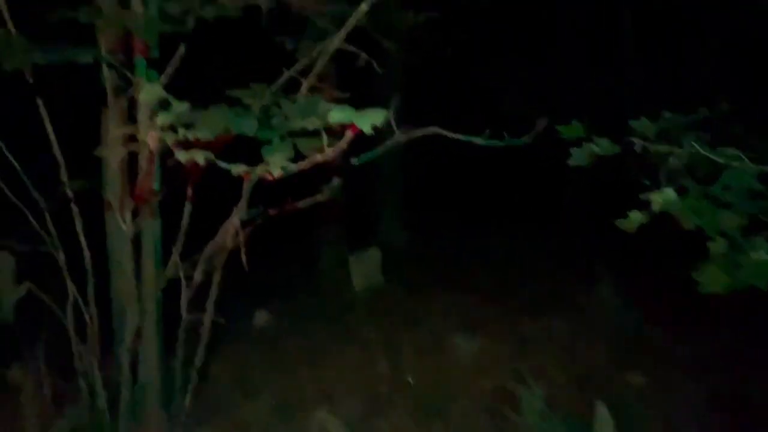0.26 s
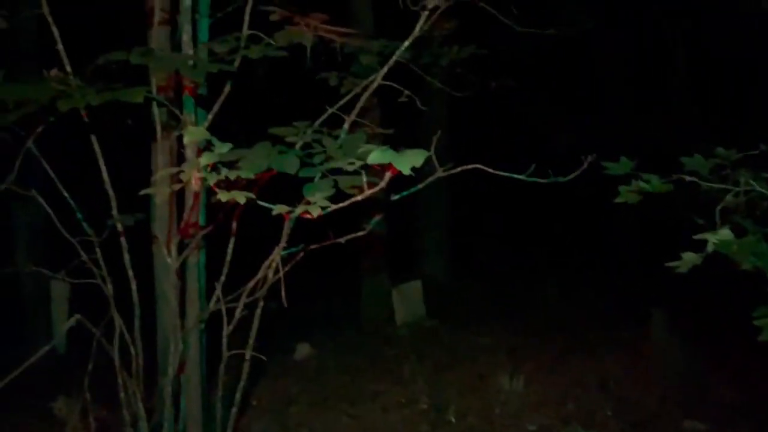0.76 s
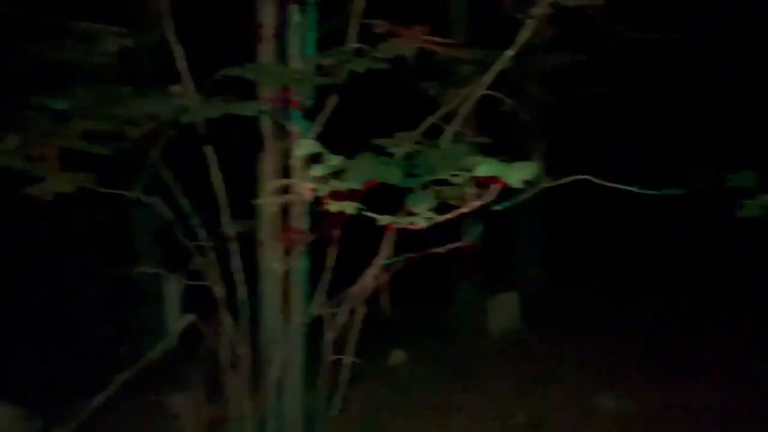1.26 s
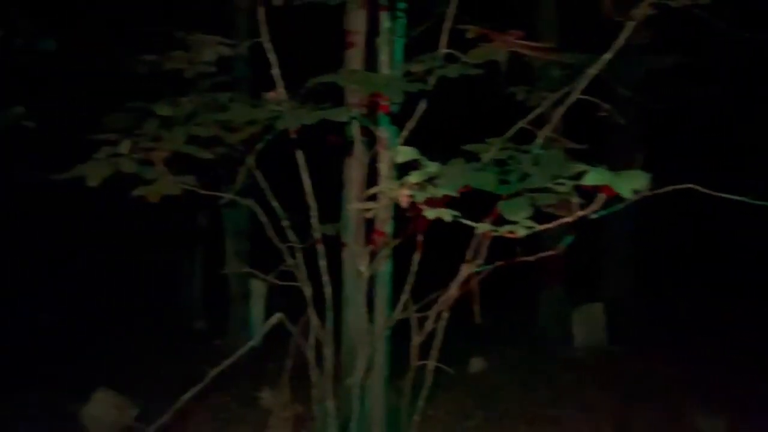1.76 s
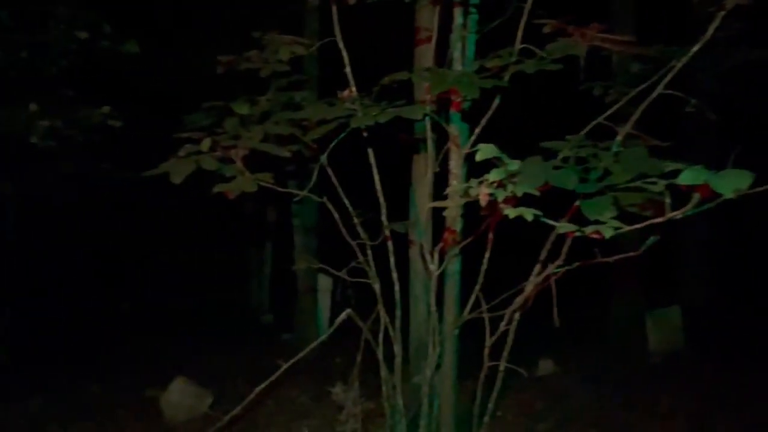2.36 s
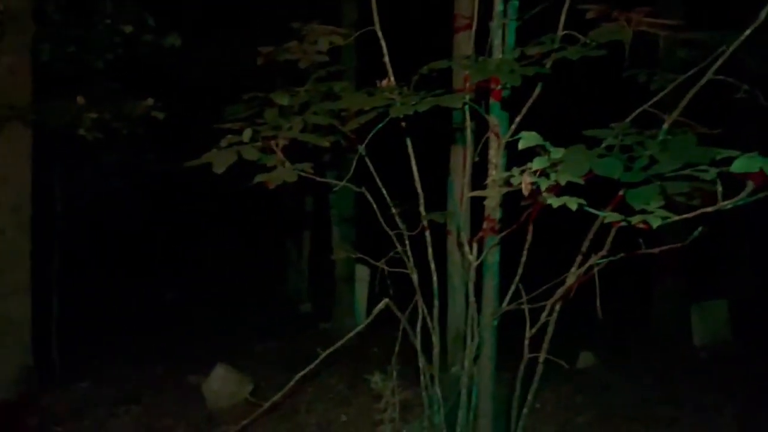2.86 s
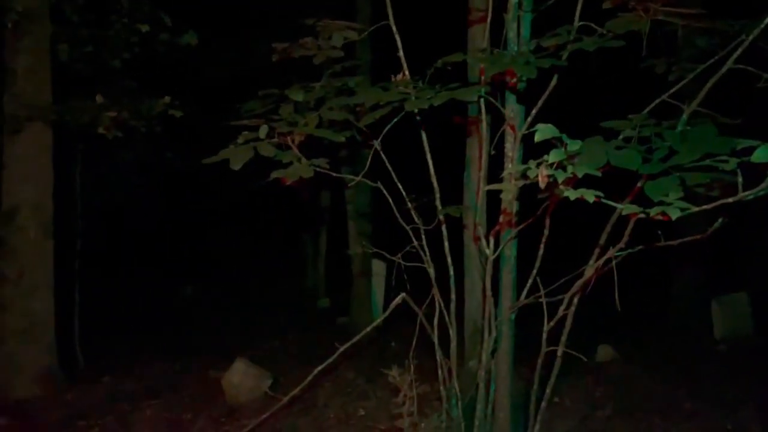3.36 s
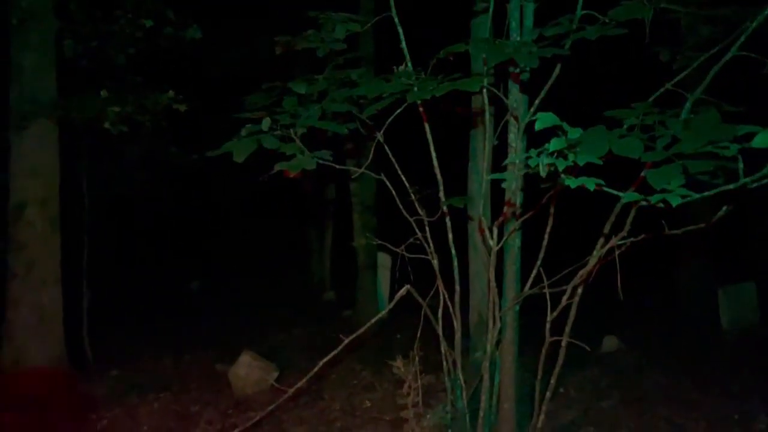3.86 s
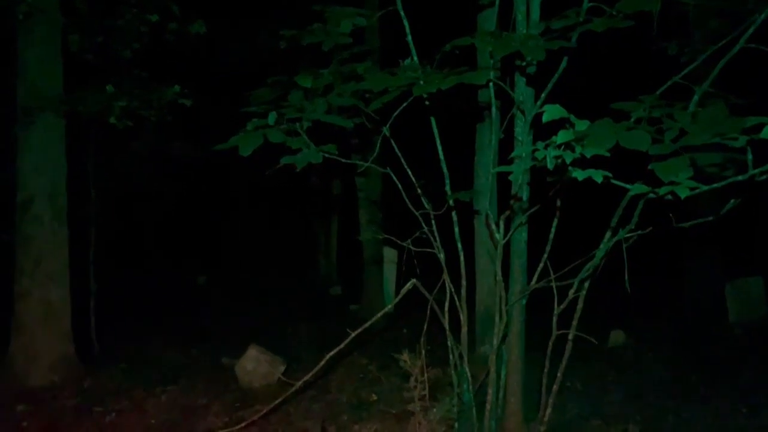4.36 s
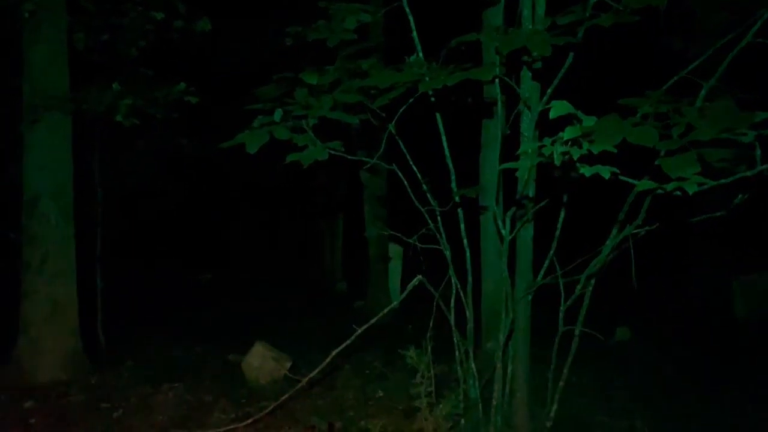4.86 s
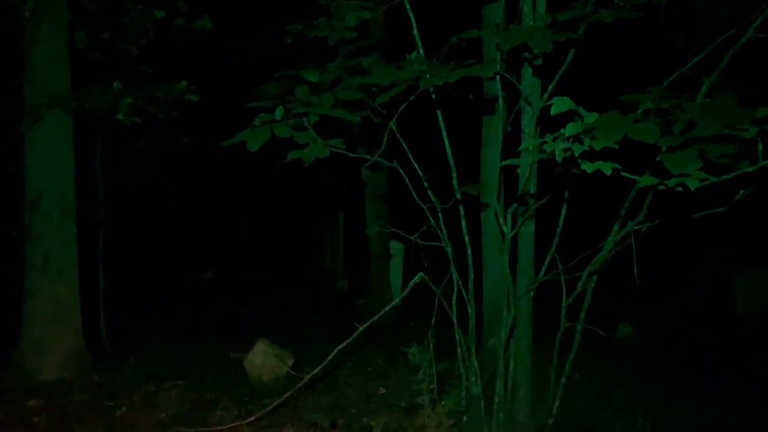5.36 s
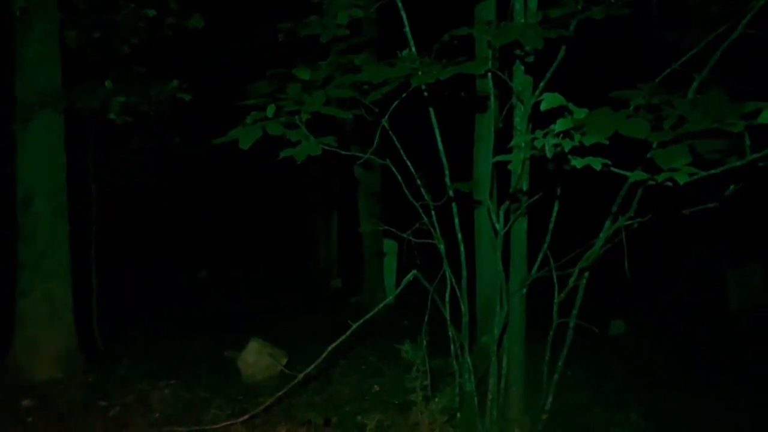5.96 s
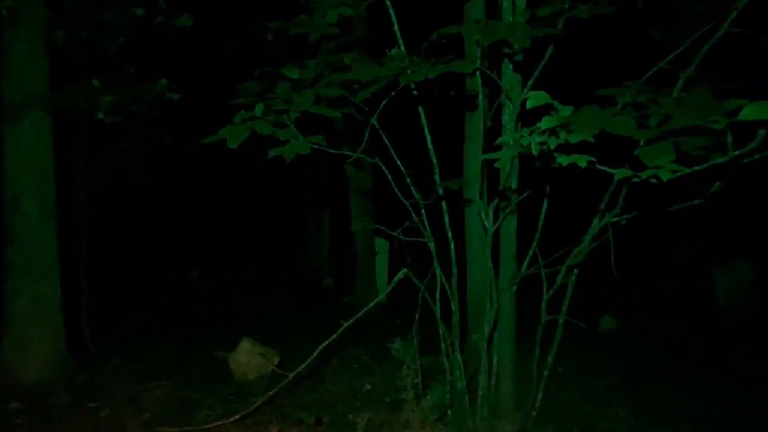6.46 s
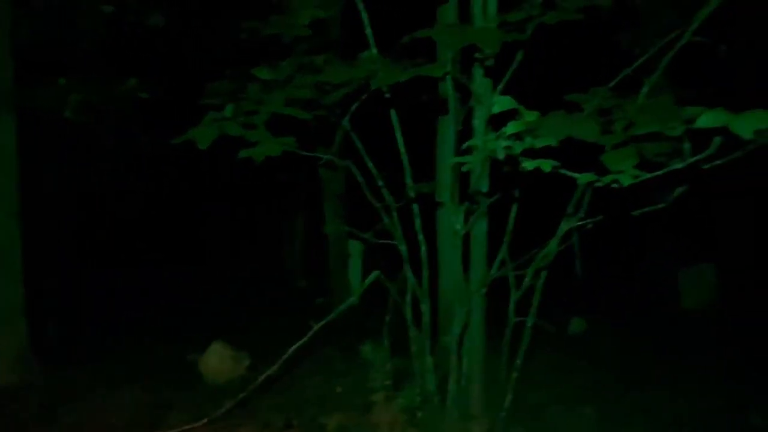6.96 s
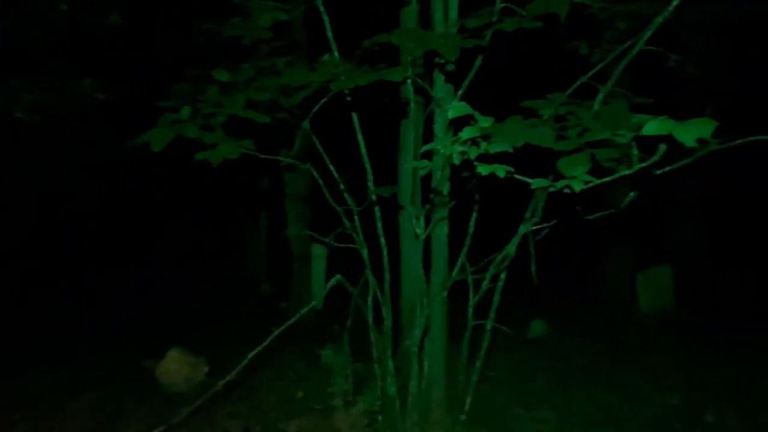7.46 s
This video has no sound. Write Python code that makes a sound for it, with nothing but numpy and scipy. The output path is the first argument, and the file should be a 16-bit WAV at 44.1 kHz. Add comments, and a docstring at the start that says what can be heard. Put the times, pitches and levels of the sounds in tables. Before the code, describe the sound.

A handheld stereo microphone in dark woodland hears continuous insects: high pulsing trills, short overlapping chirping phrases, mellow lower trills and a steady hissy buzz. A distant engine drone wavers underneath, a little stronger late. One small tick comes near one second; midway, a rough fabric rustle with crisp clicks passes close by, then only faint brushes and dull bumps follow.

```python
"""Among trees on a summer night: cricket choirs trill at several pitches over the broad buzz of katydids.
Crickets are tones gated by wing strokes with a diffuse echo; katydids and night air are shaped stereo noise.
Far engines drone below as wandering tones. Close by, cloth slides and rustles as grainy noise,
with a few snaps (millisecond noise bursts over knocks) and soft bumps (damped low rings)."""
import sys
import numpy as np
from scipy import signal
from scipy.fft import rfft, irfft
from scipy.io import wavfile

SR = 44100
rng = np.random.default_rng(int(sys.argv[2]) if len(sys.argv) > 2 else 0)


def store_pcm(level_fs):
    """Save levels as 16-bit WAV."""
    pcm = np.round(np.clip(level_fs, -1, 1) * 32767).astype(np.int16)
    wavfile.write(sys.argv[1], SR, np.atleast_2d(pcm).T)


N = 339570


def from_db(db):
    """Gain of a level in dB."""
    return 10 ** (np.asarray(db) / 20)


def rms_one(x):
    """Scale to unit rms."""
    return x / np.sqrt(np.mean(x ** 2) + 1e-20)


def in_time(rows):
    """Columns of a table, interpolated to one value per sample."""
    time_s, *columns = np.transpose(rows)
    return [np.interp(np.arange(N) / SR, time_s, column) for column in columns]


def at_hz(points):
    """A table read at every FFT bin on a log-frequency axis."""
    bin_hz = np.maximum(np.arange(N // 2 + 1) * SR / N, 1)
    point_hz, value = np.array(points).T
    return np.interp(np.log(bin_hz), np.log(point_hz), value)


def drift(rate_hz):
    """Slow chance: noise through a double one-pole low-pass, unit rms, computed every 40 samples."""
    step, settle = 40, 2000  # samples, steps
    pole = np.exp(-2 * np.pi * rate_hz * step / SR)
    noise = rng.standard_normal(N // step + settle + 2)
    slow = signal.lfilter([1], [1, -2 * pole, pole * pole], noise)[settle:]
    return np.interp(np.arange(N) / step, np.arange(len(slow)), rms_one(slow))


def colour(x, spectrum):
    """Filter by a spectrum in dB, then scale to unit rms."""
    return rms_one(irfft(rfft(x) * from_db(at_hz(spectrum)), N))


def wide_noise(spectrum, flicker_db, flicker_hz):
    """Diffuse noise at two microphone ports: their likeness and level lean vary with frequency."""
    # columns: freq_hz, left_right_likeness (0 to 1)
    likeness = [(60, 1), (130, 0.67), (290, 0.65), (640, 0.074), (1410, 0.015), (3100, 0.18), (6820, 0.92),
                (15000, 0.17)]
    # columns: freq_hz, left_minus_right_db
    lean = [(60, 2.5), (180, 1.5), (550, 1.5), (1650, 3), (4970, 3), (15000, 9.5)]
    mid, side = rfft(rng.standard_normal((2, N)))
    alike = np.clip(at_hz(likeness), 0, 1)
    signs = np.array([[1], [-1]])
    pair = np.sqrt(1 + alike) * mid + np.sqrt(1 - alike) * side * signs
    pair *= from_db(at_hz(lean) / 2 * signs)
    pair[1] *= np.exp(-2j * np.pi * np.arange(N // 2 + 1) / N)  # right port one sample late
    return colour(irfft(pair, N), spectrum) * from_db(flicker_db * drift(flicker_hz))


def swell(since_s, length_s, rise_s, fall_s):
    """Gain that rises linearly, holds to the given length, then falls."""
    rise = since_s / rise_s
    fall = (length_s - since_s) / fall_s + 1
    return np.clip(np.minimum(rise, fall), 0, 1)


def trill(pitch_hz, strokes_per_s, sharpness, scatter_rad):
    """Each wing stroke is a short tone that sags in pitch, with a new phase and strength."""
    tempo_drift, sag_hz = .004, 70  # share of the stroke rate; fall over one stroke
    rate = strokes_per_s * (1 + tempo_drift * drift(3.8))
    stroke = np.cumsum(rate) / SR + rng.random()
    slip, strength = rng.standard_normal((2, 1000))
    which = stroke.astype(int)
    sagging_hz = pitch_hz - sag_hz * (stroke % 1 - .5)
    phase = 2 * np.pi * np.cumsum(sagging_hz) / SR + scatter_rad * np.cumsum(slip)[which]
    pulse = np.abs(np.sin(np.pi * stroke)) ** sharpness
    return np.sin(phase) * pulse * from_db(0.28 * drift(16) + 1.6 * strength[which])


def wing_band(song, hz):
    """The wings radiate only near their own pitch."""
    width = .1  # share of the pitch passed to either side
    edges_hz = [hz * (1 - width), hz * (1 + width)]
    return signal.sosfilt(signal.butter(2, edges_hz, "band", fs=SR, output="sos"), song)


def among_trees(song, pan_db, echo_db):
    """The trunks scatter a song into a diffuse tail of its own at each port; unit rms."""
    wood_t60_s = 0.75
    t = np.arange(SR // 2) / SR
    tail = rng.standard_normal((2, len(t))) * from_db(-60 * t / wood_t60_s)
    echoes = rms_one(signal.fftconvolve(song[None], tail, axes=1)[:, :N])
    direct = np.array([song, np.roll(song, 1)])  # right port one sample late
    mix = rms_one(direct) + from_db(echo_db) * echoes
    return rms_one(mix * from_db([[pan_db / 2], [-pan_db / 2]]))


def choir(hz, gain, spread_hz, strokes_per_s, sharpness, scatter_rad, pan_db, echo_db, count):
    """Crickets of one kind spread roughly evenly in pitch, each at its own tempo."""
    places = np.arange(count) - (count - 1) / 2 + rng.uniform(-.3, .3, count)
    places *= 2 / count
    places -= places.mean()
    song = np.zeros(N)
    for place in places:
        pitch_hz = hz + spread_hz * (place + .25 * drift(2.5))
        song += trill(pitch_hz, strokes_per_s * (1 + .03 * place), sharpness, scatter_rad)
    return gain * among_trees(wing_band(song, hz[-1]), pan_db, echo_db)


def on_curve(rows):
    """Pitch and gain of a choir that sings throughout."""
    hz, level_db = in_time(rows)
    return hz, from_db(level_db)


def lone_trills():
    """Pitch and gain of a lone middle voice: each trill starts flat, climbs to its pitch and slowly fades."""
    # columns: start_s, length_s, settled_hz, start_db
    trills = [(-0.96, 1.42, 2585, -56.5), (1.84, 2.07, 2600, -58), (5.0, 1.75, 2596, -60),
              (7.5, .6, 2630, -59.5)]
    climb_hz, climb_s, edge_s, fade_db_per_s = 99.63, .13, 0.066, 0.55
    t, hz, gain = np.arange(N) / SR, np.zeros(N), np.zeros(N)
    for start_s, length_s, settled_hz, start_db in trills:
        since_s = t - start_s
        on = since_s >= 0
        hz[on] = settled_hz - climb_hz * np.exp(-since_s[on] / climb_s)
        gain += from_db(start_db - fade_db_per_s * since_s) * swell(since_s, length_s, edge_s, edge_s)
    return hz, gain


def surges():
    """Pitch and gain of the high choir: each surge swells fast, sinks and creeps up in pitch."""
    # columns: start_s, level_db (before rise and sink)
    surge_rows = [(-.04, -48.5), (.3, -46), (.56, -47), (.92, -47), (1.3, -47), (1.82, -47.5),
                  (2.08, -49.5), (2.29, -47), (2.679, -48), (3.1, -48), (3.731, -45.5), (4.13, -45),
                  (4.548, -44), (4.9, -55), (5.26, -46.5), (5.619, -46), (5.99, -45.5), (6.338, -46),
                  (6.699, -46), (7.14, -46.5), (7.4, -44.5)]
    start_hz, floor_db = 5762, -53
    rise_s, sink_db_per_s, climb_hz_per_s = 0.026, 25, 120
    t, hz, gain = np.arange(N) / SR, np.zeros(N), np.full(N, from_db(floor_db))
    for start_s, level_db in surge_rows:
        since_s = np.maximum(t - start_s, 0)
        on = t >= start_s
        hz[on] = start_hz + climb_hz_per_s * since_s[on]
        surge = from_db(level_db - sink_db_per_s * since_s) * np.minimum(since_s / rise_s, 1)
        gain = np.maximum(gain, surge)
    return hz, gain


def cricket_choirs():
    """Five kinds of cricket: low, lone middle, high, farther middle and one thin low voice."""
    # one row a kind: spread_hz, strokes_per_s, sharpness, scatter_rad, left_minus_right_db, echo_db
    kinds = [(74.9, 55, 1.9, 0.937, 3, 3), (8, 58.7, 2.2, 0.46, 8.5, -5.5),
             (60.07, 52, 0.57, 0.937, 7.5, -2), (40.05, 58, 1.8, 0.793, 3, -4),
             (8.276, 50, 0.38, 0.904, 14, 0.5)]
    # crickets in each choir
    counts = [4, 1, 5, 3, 1]
    # slowly drifting choirs, columns: time_s, wing_pitch_hz, level_db
    low_choir = [(0.0, 2160, -61), (0.23, 2130, -59.5), (0.32, 2102, -62.5), (3.19, 2110, -68),
                 (3.28, 2150, -60), (3.43, 2145, -59), (3.47, 2160, -63), (3.67, 2180, -59),
                 (3.77, 2140, -63.5), (4.24, 2168, -59), (4.97, 2173, -65.5), (5.38, 2170, -61),
                 (5.49, 2164, -72), (5.53, 2145, -65), (7.27, 2134, -63.5), (7.4, 2190, -58),
                 (7.46, 2115, -70), (7.7, 2067, -68)]
    far_choir = [(0, 2632, -61), (.4, 2620, -57), (.5, 2640, -59.5), (1, 2652, -63.5), (1.8, 2628, -67),
                 (2, 2647, -63), (3.8, 2640, -63), (4.1, 2665, -63), (4.7, 2673, -69), (6.9, 2656, -62),
                 (7.7, 2640, -62.5)]
    thin_voice = [(0, 1967, -83), (1.3, 1988, -68), (5.1, 1977, -67.5), (5.4, 1976, -76), (6.4, 1992, -72),
                  (6.7, 1974, -70), (7.7, 1987, -68)]
    songs = [on_curve(low_choir), lone_trills(), surges(), on_curve(far_choir), on_curve(thin_voice)]
    return sum(choir(*song, *kind, count=n) for song, kind, n in zip(songs, kinds, counts))


def phrases():
    """Crickets in short phrases: each glides from its first pitch, with soft ends, sung by two neighbours."""
    # columns: start_s, length_s, first_hz, glide_hz, gain_db
    phrase_rows = [(0.0, 0.98, 4970, 50.5, -62.5), (.38, 0.26, 4850, 50.5, -58.5),
                   (.76, 0.3, 4400, 48.5, -65), (.62, 0.38, 4895, 170, -68), (1.08, 0.435, 5100, 80, -55.5),
                   (1.04, 0.3, 4800, -40, -59), (1.25, .28, 4830, 29.5, -61), (1.93, .2, 4870, 19, -60),
                   (1.96, 0.37, 4960, 30, -61.5), (2.15, 0.33, 4680, -9.5, -62),
                   (2.44, 0.36, 4950, 11, -66), (2.9, 0.32, 4880, 50.5, -62), (3.08, 0.36, 5060, 49.5, -53),
                   (3.07, 0.2, 4510, 51, -60), (3.58, .3, 4800, 39.5, -60), (3.74, 0.22, 5000, 50, -59),
                   (4.14, 0.33, 4970, 11, -59), (4.16, .4, 4800, -20.5, -67), (4.76, .3, 4930, 20, -60),
                   (4.86, 0.35, 4760, 61, -62), (4.9, .3, 4613, 19, -67), (5.02, 0.29, 5020, 29, -61),
                   (5.3, 0.26, 4930, 32, -62), (5.54, 0.29, 4880, 190, -57.5), (5.8, 0.32, 5100, 52, -53.5),
                   (6.05, 0.36, 4674, -9, -59), (6.28, 0.55, 4847, 122, -67), (6.42, .33, 4420, 1, -68),
                   (6.86, 0.3, 4950, 19, -65), (6.9, .36, 4750, 30, -61.5), (6.92, .3, 4520, -2, -68),
                   (7.25, 0.3, 4850, 43.5, -61), (7.3, .3, 4680, 30, -68), (7.48, 0.25, 4996, 93, -60)]
    # pitch offsets of the two neighbours [Hz]
    neighbours_hz = [-25, 22.13]
    strokes_per_s, slip_rad, edge_s, pan_db, echo_db = 55, .85, 0.044, 7, 3.5
    song, t = np.zeros(N), np.arange(N) / SR
    voices = [(np.full(N, 5000.), np.zeros(N)) for _ in range(4)]  # pitch, gain; phrases take turns
    for k, (start_s, length_s, first_hz, glide_hz, gain_db) in enumerate(phrase_rows):
        pitch_hz, gain = voices[k % 4]
        on = (t >= start_s) & (t < start_s + length_s)
        part = (t[on] - start_s) / length_s
        to_end_s = length_s * np.minimum(part, 1 - part)
        pitch_hz[on] = first_hz + glide_hz * part ** 0.86
        gain[on] = from_db(gain_db) * np.minimum(1, to_end_s / edge_s)
    for k, (pitch_hz, gain) in enumerate(voices):
        rate = strokes_per_s + 3.0 * (k - 1)
        pair = sum(trill(pitch_hz + hz + 20 * drift(8), rate, 1.5, slip_rad) for hz in neighbours_hz)
        song += gain * rms_one(pair)
    song = wing_band(song, 4870)
    return song.std() * among_trees(song, pan_db, echo_db)


def katydids():
    """Far katydids swell together: flickering noise on a level curve."""
    # columns: freq_hz, density_db (relative, per Hz)
    spectrum = [(2500, -23), (2900, -4), (3150, -1.5), (3650, -3), (3950, -13), (4150, -18), (4500, -6),
                (4950, 1), (5180, -10.5), (5350, -5), (5600, -55)]
    # columns: time_s, level_db
    song = [(0, -61.5), (.45, -61), (.67, -61), (.82, -66.5), (.98, -59), (1.29, -59.5), (1.4, -63),
            (1.55, -60), (2.03, -64.5), (2.15, -61), (2.7, -60), (2.82, -69), (2.95, -58.5), (3.75, -60.5),
            (4.1, -64.5), (4.55, -61.5), (5.1, -62.5), (5.4, -65.5), (5.7, -58.5), (6.25, -66), (7.05, -58),
            (7.7, -66)]
    [level_db] = in_time(song)
    return from_db(level_db) * wide_noise(spectrum, 1.63, 8.9)


def rasp():
    """A thinner rasp between the choirs: narrower noise with hollows in its level."""
    # columns: freq_hz, density_db (relative, per Hz)
    spectrum = [(3500, -34), (3800, 3.5), (4100, -3), (4450, -0.5), (4700, -57)]
    # columns: time_s, level_db
    song = [(0, -71), (.6, -74), (.8, -74), (.95, -67), (1.25, -64), (1.4, -74), (1.52, -69), (1.82, -67),
            (2.0, -78), (2.3, -68), (2.55, -74), (2.9, -66), (3.7, -69), (4.1, -76), (4.55, -71),
            (4.95, -72), (5.12, -88), (5.42, -76), (5.6, -73), (6.02, -73), (6.15, -80), (6.33, -80),
            (6.45, -70), (6.8, -78), (7.06, -66), (7.7, -81)]
    [level_db] = in_time(song)
    return from_db(level_db) * wide_noise(spectrum, 2.7, 10.0)


def buzz():
    """Broad insect buzz: two unbroken bands of noise with a slight flicker."""
    # columns: freq_hz, density_db (relative, per Hz)
    middle = [(5300, -35.5), (5600, -2.5), (5900, -0.5), (6500, 2.5), (6750, -5), (7130, -15.5),
              (7600, -38), (8200, -103)]
    high = [(8300, -48), (9200, -9.5), (10000, -20), (10700, -7), (11500, -1.5), (12000, -7), (12900, -11),
            (13600, -33), (14300, -69)]
    return from_db(-47) * wide_noise(middle, 0.8, 22.0) + from_db(-67) * wide_noise(high, 0.67, 15.0)


def drones():
    """Engine notes blurred by distance: tones whose size and phase wander."""
    # columns: time_s, drifting_note_hz, its gain_db, gain_db of each of three steady notes
    drone_rows = [(0, 115.7, -57, -58, -70, -67), (.8, 112.6, -64, -58, -50.5, -57),
                  (2.3, 114.7, -56, -66, -57, -62.5), (2.9, 115.9, -56.5, -54, -56, -61.5),
                  (3.9, 112.5, -57, -56, -57, -62), (4.3, 109.7, -51.5, -45, -66, -63),
                  (4.9, 110.5, -56, -46.5, -61, -71), (5.9, 111.5, -54.5, -46.5, -56, -66),
                  (6.3, 115.1, -53.5, -52.5, -61, -73), (6.85, 115, -47, -41, -65, -52),
                  (7.2, 113, -52.5, -50, -72, -63), (7.7, 116, -50.5, -51, -71, -64)]
    # pitches of the steady notes [Hz]
    steady_hz = [69.16, 82.9, 131.3]
    drifting_hz, *gains_db = in_time(drone_rows)
    notes_hz = [drifting_hz] + [np.full(N, hz) for hz in steady_hz]
    out = np.zeros(N)
    for hz, gain_db in zip(notes_hz, gains_db):
        phase = 2 * np.pi * np.cumsum(hz) / SR
        tone = (2.14 + drift(2.8)) * np.sin(phase) + drift(3.8) * np.cos(phase)
        out += from_db(gain_db) * rms_one(tone)
    return out * np.array(from_db([[.9], [-.9]]))


def night_air():
    """Night air, from far traffic up to the farthest insects: broad noise that swells and ebbs."""
    # columns: freq_hz, density_db (relative, per Hz)
    spectrum = [(20, -48), (33, -31), (44, -2), (70, 0.5), (130, -12), (250, -15.5), (500, -27),
                (1100, -52.5), (1700, -35.5), (2400, -25), (3600, -45), (4050, -57), (4500, -43),
                (5200, -39), (5500, -30), (7500, -76), (9000, -84)]
    # columns: time_s, swell_db (only its departure from the mean counts)
    swell_rows = [(0, -60), (.6, -61.5), (2.1, -62.5), (2.5, -60.5), (3.8, -61.5), (4.6, -63), (7.7, -62)]
    [swell_db] = in_time(swell_rows)
    return from_db(-48.5 + swell_db - swell_db.mean()) * wide_noise(spectrum, 1.7, 5.4)


def handling():
    """Gains of fine hiss, coarse hiss and body over time: the main slide of cloth and small brushes."""
    # columns: time_s, fine_hiss_db, body_over_fine_db
    slide = [(3.05, -88, -3), (3.13, -62, -7), (3.23, -59, 4), (3.285, -35.5, -3), (3.32, -35, -2.5),
             (3.355, -36.5, -0.5), (3.4, -34, 0.5), (3.435, -37.5, 1), (3.444, -40, 2), (3.48, -47.5, 5.5),
             (3.51, -41.5, -4), (3.6, -54.5, 4.5), (3.63, -46.5, 2), (3.645, -44.5, -6), (3.675, -48, 7.5),
             (3.72, -61.5, 4.5), (4.02, -63.5, -4), (4.1, -78, 5)]
    # columns: start_s, length_s, fine_hiss_db, coarse_over_fine_db, body_over_fine_db
    brushes = [(0.94, 0.017, -72, 4, 2), (4.122, 0.094, -82, 3, 10), (4.326, .03, -60, -17, -1),
               (4.393, 0.1, -77, 9, 10), (4.682, 0.026, -83, 11, 8), (4.778, 0.029, -86, 6, -1),
               (5.418, .1, -57.5, -50, -36), (5.54, 0.096, -67.5, -41, -8)]
    slide_coarse_db, brush_rise_s, brush_fall_s = -11.5, 0.02, 0.068
    t = np.arange(N) / SR
    fine_db, body_db = in_time(slide)
    over_fine = np.array([np.ones(N), np.full(N, from_db(slide_coarse_db)), from_db(body_db)])
    gains = from_db(fine_db) * over_fine
    for start_s, length_s, hiss_db, coarse_db, over_db in brushes:
        levels = from_db(hiss_db + np.array([[0], [coarse_db], [over_db]]))
        gains += levels * swell(t - start_s, length_s, brush_rise_s, brush_fall_s)
    return gains


def rustle():
    """Fibres slip in dense uneven grains with sharper crackles, which feed both hiss and body of the rub."""
    # columns: freq_hz, density_db (relative, per Hz)
    fine_spectrum = [(8800, -30), (9500, -8), (10200, -2), (11200, 0), (12200, -7), (12700, -17),
                     (13100, -45), (13600, -80)]
    coarse_spectrum = [(6500, -30), (7500, -5), (8200, -3), (9000, 0), (9600, -4), (10300, -25),
                       (12000, -70)]
    rub_spectrum = [(80, -2), (180, 5), (500, 5), (1200, 2), (2400, -0.5), (3500, 2), (5500, 0), (7000, 0),
                    (8200, -48), (9000, -78), (11000, -70)]
    # the rub is on the left of the housing, which shades the right port
    # columns: freq_hz, gain_db
    shade = [(200, -0.5), (700, -6), (2000, 0.5), (3500, -7.5), (4600, -14), (6000, -6), (8000, -33)]
    # columns: freq_hz, phase_lag_rad
    shade_lag = [(200, 0.11), (1000, 1.47), (3000, 2.1), (4500, 0.98), (8000, 2.9)]
    fine, coarse, body = handling()
    crackles_per_s = 1100
    crackle_db = 5.5 + 3.0 * np.minimum(rng.exponential(1, N), 2.4)
    crackle = (rng.random(N) < crackles_per_s / SR) * from_db(crackle_db)
    crackle = signal.lfilter([1], [1, -.88], crackle)  # each dies away over some samples
    grains = rng.standard_normal(N) * (from_db(2.7 * drift(70)) + crackle / 2.7)
    hiss = fine * colour(grains, fine_spectrum) + coarse * colour(grains, coarse_spectrum)
    # the ports hear the same rub in the lows and ever more different ones above
    own = signal.lfilter([1, -.9], [1], rng.standard_normal((2, N))) * from_db(2.2 * drift(125))
    left, right = colour(rms_one(grains) + 2.34 * own, rub_spectrum)
    shading = from_db(at_hz(shade)) * np.exp(-1j * at_hz(shade_lag))
    right = irfft(rfft(right) * shading, N)
    return hiss + body * np.array([left, right])


def band_pass(x, order, band_hz):
    """Butterworth band-pass."""
    return signal.sosfilt(signal.butter(order, band_hz, "band", fs=SR, output="sos"), x)


def snaps():
    """Each snap is a millisecond burst of cracks in treble and middle, over a short knock at its own pitch."""
    # columns: start_s, treble_gain_db, middle_gain_db, knock_gain_db, knock_hz
    snap_rows = [(0.9653, -42, -45, -48.5, 1760), (3.1388, -39, -49, -65, 1510),
                 (3.305, -21, -34, -35, 1490), (3.4498, -17.5, -36, -36, 900),
                 (3.488, -23.5, -32, -52, 1900), (3.5045, -17, -22.5, -36, 1110),
                 (3.525, -40, -45, -60, 1500), (3.57, -50, -50, -52, 1100), (3.595, -48, -47, -43.5, 1200),
                 (3.621, -42, -49, -46, 800), (3.633, -44, -50, -43, 1300), (3.6391, -29, -50, -53, 700),
                 (3.6665, -25, -25, -40, 1340), (3.6725, -48, -52, -46, 700), (3.6984, -34, -30, -55, 1500),
                 (3.759, -41, -48, -64, 1490), (3.803, -43, -50, -66, 1497), (3.8486, -46, -52, -64, 1500),
                 (3.867, -60, -54, -53, 1600), (3.8786, -51, -50, -66, 799), (3.916, -46, -52, -65, 1500),
                 (3.927, -42, -50, -68, 1490), (3.968, -56, -54, -55, 1510), (3.9858, -49, -56, -68, 1500),
                 (4.0192, -49, -56, -68, 700), (4.042, -55, -58, -54, 1450), (4.348, -39, -52.5, -59, 1200),
                 (4.6987, -45, -56.5, -67, 1400), (4.796, -50, -54, -72, 1500)]
    # treble band, then middle band: low_edge_hz, high_edge_hz
    bands_hz = [(7620, 11900), (2470, 7300)]
    burst_ms, knock_ms = 1.1, .65  # time to the height of each
    air_hz, air_db = (13600, 15800), -22  # thin top over the treble burst
    bursts, knocks, t_ms = np.zeros((2, N)), np.zeros(N), np.arange(300) / SR * 1000
    cracks = .65 * rng.standard_normal((len(snap_rows), 2, len(t_ms)))
    burst_shape = (t_ms / burst_ms * np.exp(1 - t_ms / burst_ms)) ** 2
    knock_shape = t_ms / knock_ms * np.exp(1 - t_ms / knock_ms)
    for (start_s, treble_db, middle_db, knock_db, knock_hz), crack in zip(snap_rows, cracks):
        at = round(start_s * SR)
        span = slice(at, at + len(t_ms))
        crack[:, round(burst_ms * SR / 1000)] = 6  # one crack stands out at the height of the burst
        bursts[:, span] += from_db([[treble_db], [middle_db]]) * crack * burst_shape
        knocks[span] += from_db(knock_db) * knock_shape * np.sin(2 * np.pi * knock_hz * t_ms / 1000)
    treble, middle = [band_pass(burst, 6, band) for band, burst in zip(bands_hz, bursts)]
    treble += from_db(air_db) * band_pass(bursts[0], 4, air_hz)
    return treble + (middle + knocks) * from_db([[2.2], [-2.2]])


def bumps():
    """A soft knock on the housing sets a low, quickly damped ring going."""
    # columns: start_s, gain_db (before onset and decay)
    bump_rows = [(1.892, -32), (3.508, -25), (3.682, -32), (5.574, -29.5), (6.742, -29.5)]
    ring_hz, t60_s, onset_s = 201, 0.018, 0.0013
    out, t = np.zeros(N), np.arange(4000) / SR
    for start_s, gain_db in bump_rows:
        at = round(start_s * SR)
        ring = from_db(gain_db - 60 * t / t60_s) * np.sin(2 * np.pi * ring_hz * t)
        out[at:at + len(t)] += ring * (1 - np.exp(-t / onset_s))
    return out


def scene():
    """Insects, far engines, night air and the handling close by."""
    insects = cricket_choirs() + phrases() + katydids() + rasp() + buzz()
    return insects + drones() + night_air() + rustle() + snaps() + bumps()


def record(dry):
    """Both channels share the right port's treble, inverted and slightly late on the left; the top is cut."""
    split_hz, treble_lag_samples, cutoff_hz = 7900, 13, 16500
    low = signal.sosfiltfilt(signal.butter(6, split_hz, fs=SR, output="sos"), dry)
    treble = (dry - low)[1]
    out = low + np.array([-np.roll(treble, treble_lag_samples), treble])
    return signal.sosfilt(signal.cheby2(12, 70, cutoff_hz, fs=SR, output="sos"), out)


dry = scene()
out = record(dry)
store_pcm(out)
```